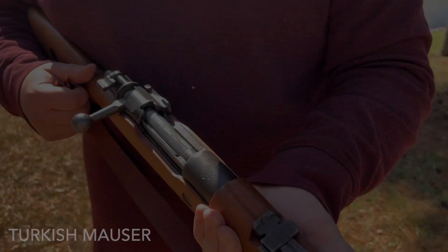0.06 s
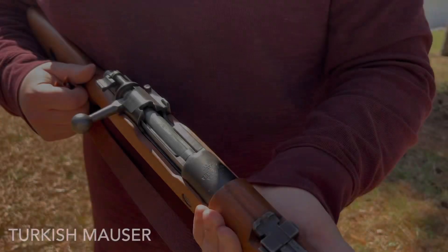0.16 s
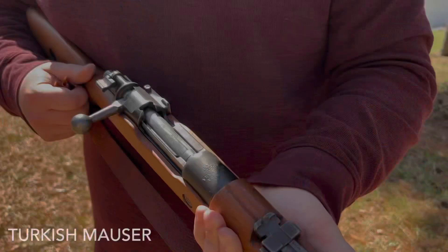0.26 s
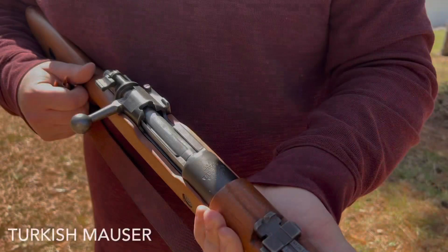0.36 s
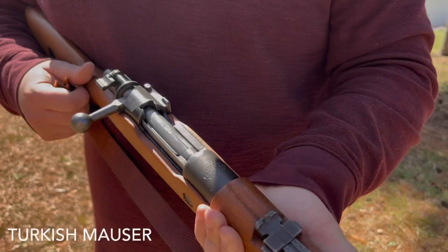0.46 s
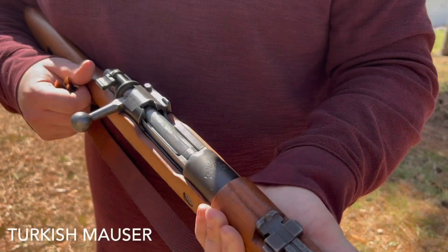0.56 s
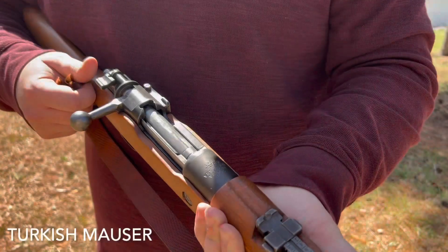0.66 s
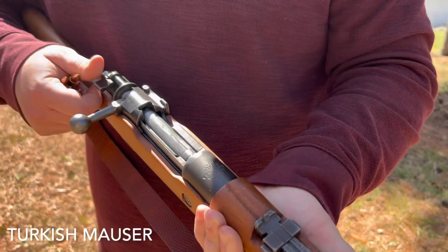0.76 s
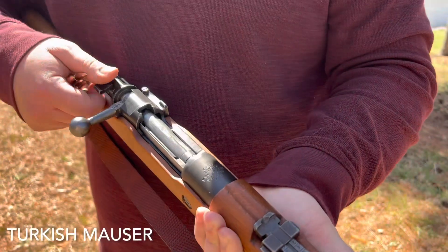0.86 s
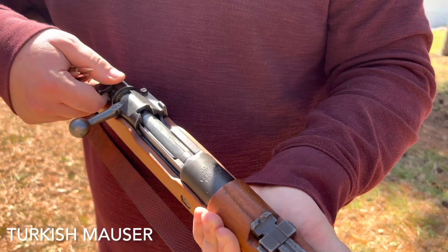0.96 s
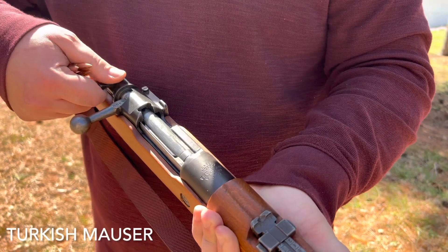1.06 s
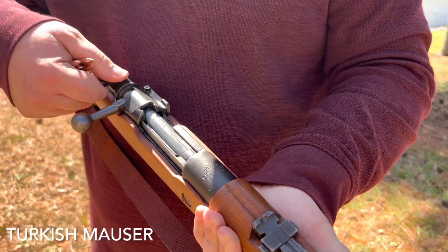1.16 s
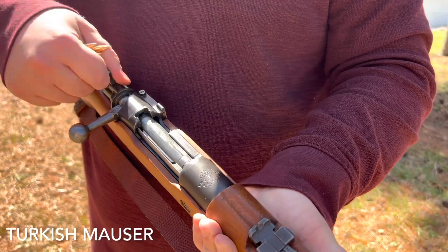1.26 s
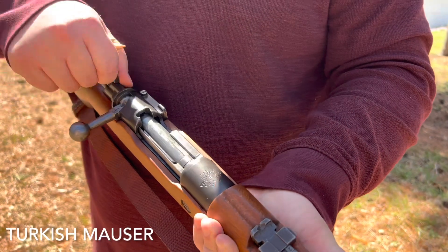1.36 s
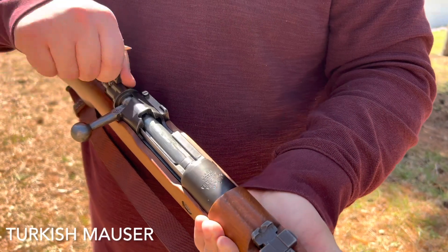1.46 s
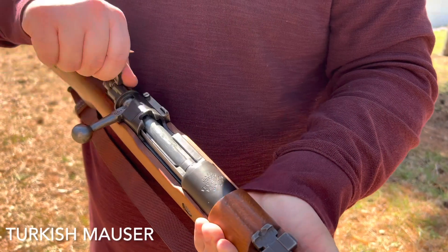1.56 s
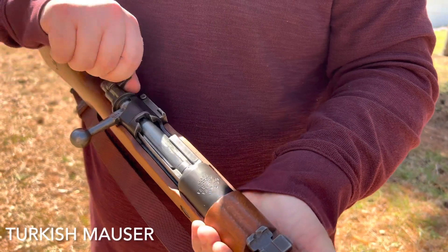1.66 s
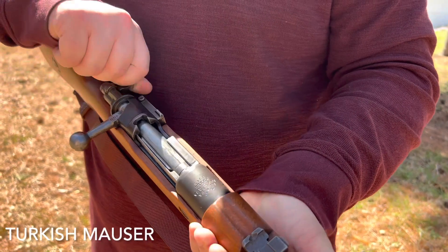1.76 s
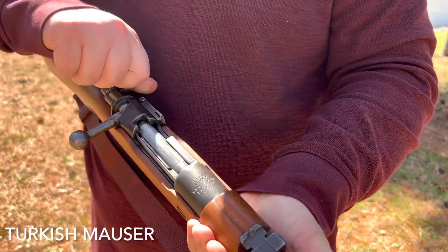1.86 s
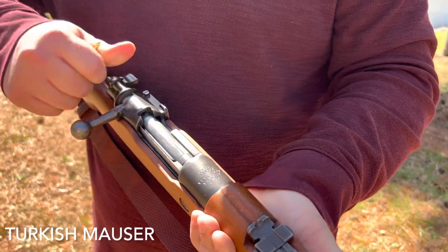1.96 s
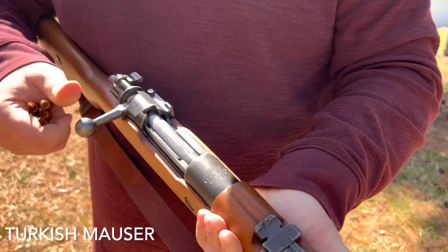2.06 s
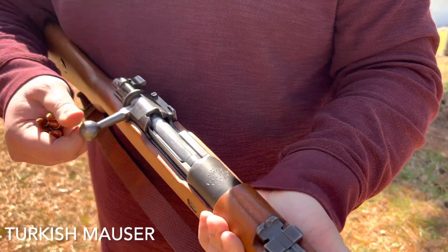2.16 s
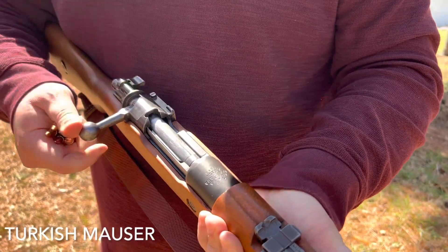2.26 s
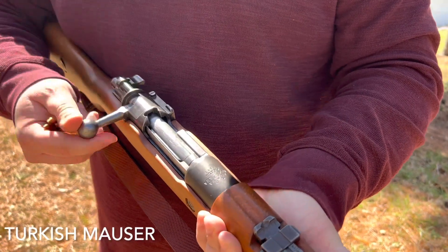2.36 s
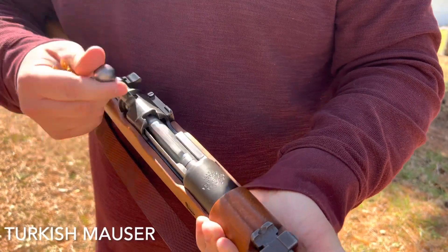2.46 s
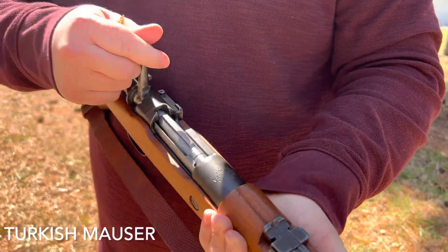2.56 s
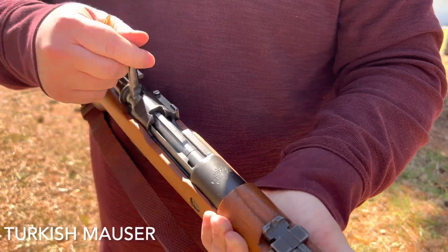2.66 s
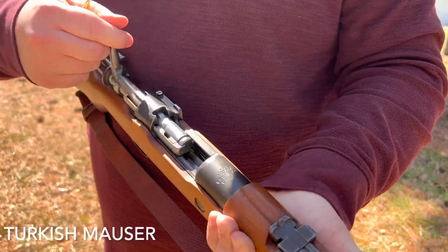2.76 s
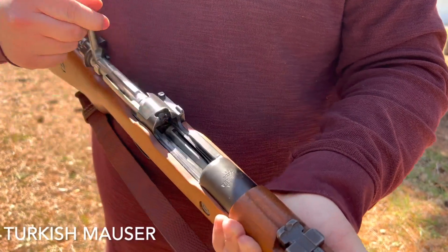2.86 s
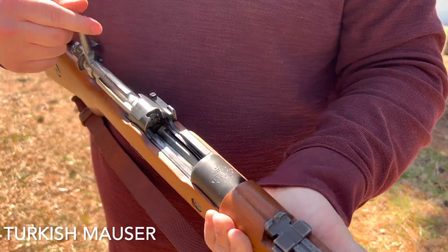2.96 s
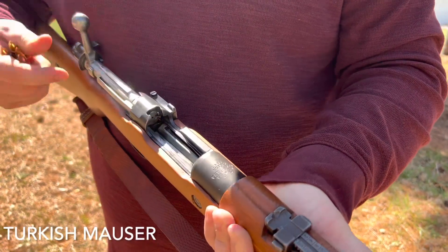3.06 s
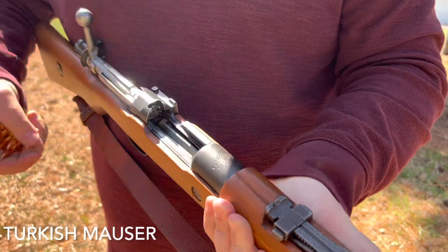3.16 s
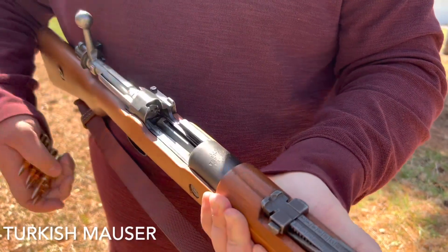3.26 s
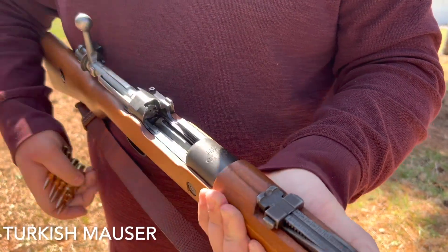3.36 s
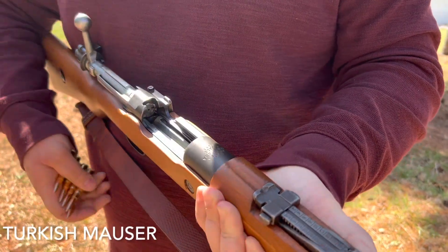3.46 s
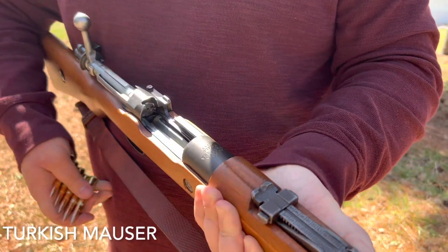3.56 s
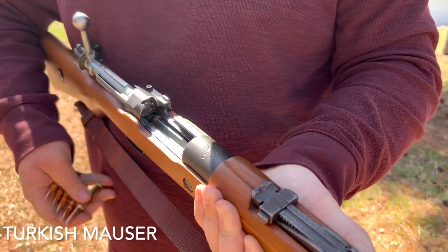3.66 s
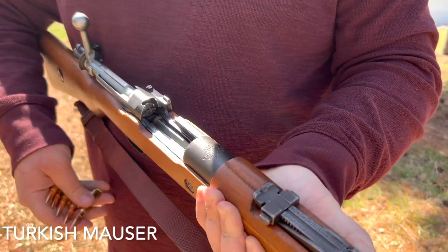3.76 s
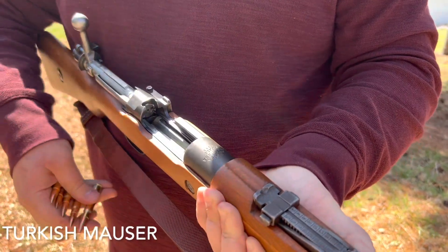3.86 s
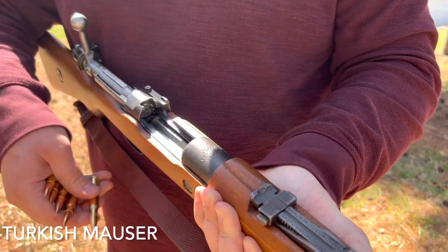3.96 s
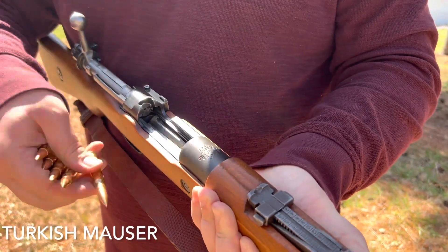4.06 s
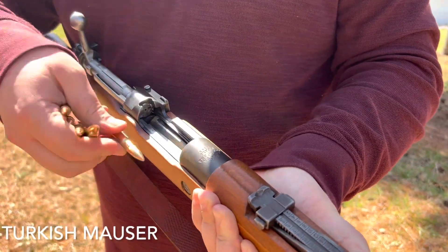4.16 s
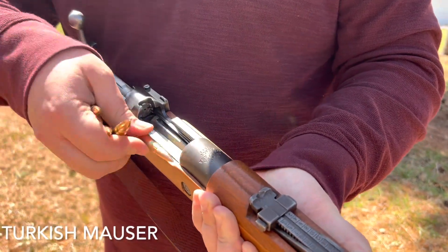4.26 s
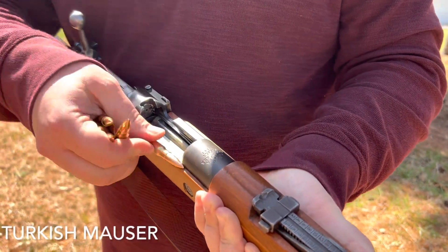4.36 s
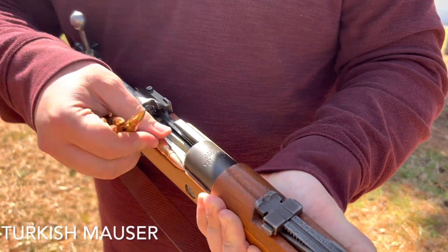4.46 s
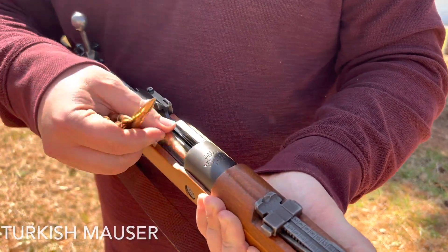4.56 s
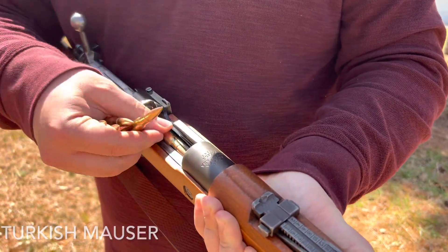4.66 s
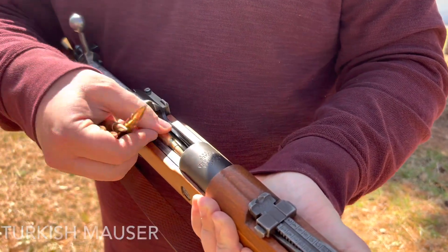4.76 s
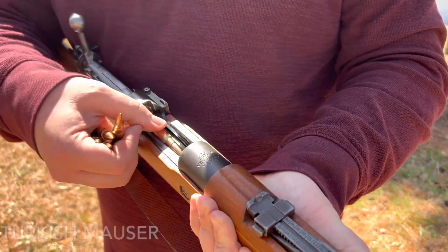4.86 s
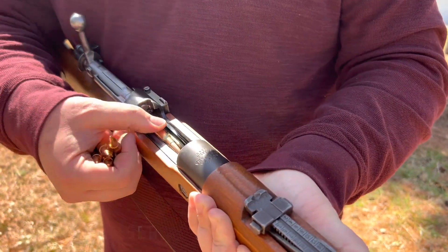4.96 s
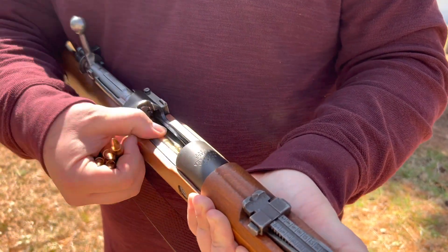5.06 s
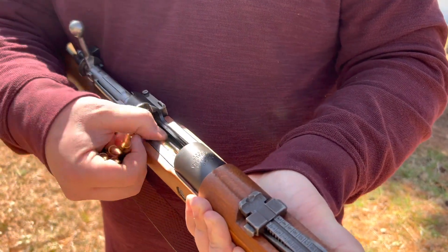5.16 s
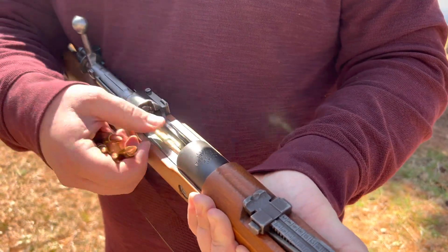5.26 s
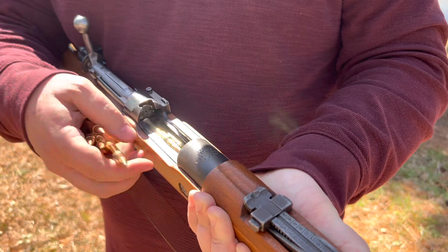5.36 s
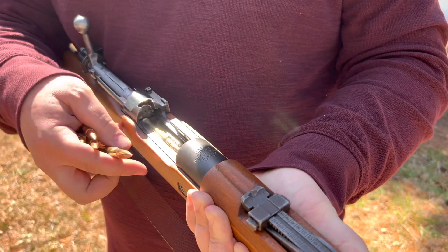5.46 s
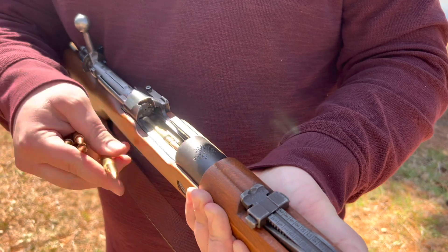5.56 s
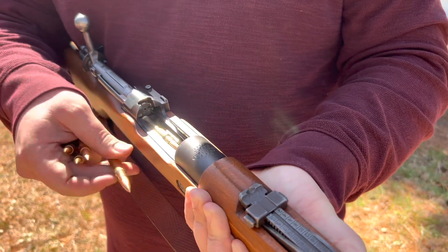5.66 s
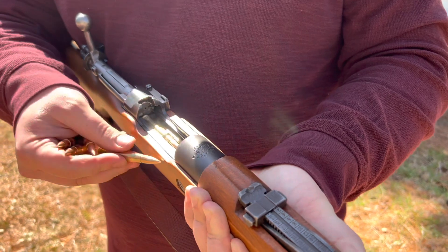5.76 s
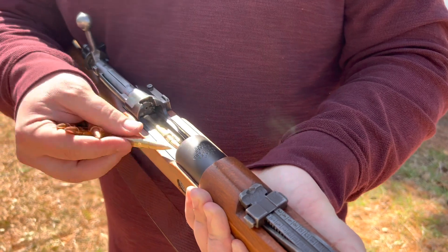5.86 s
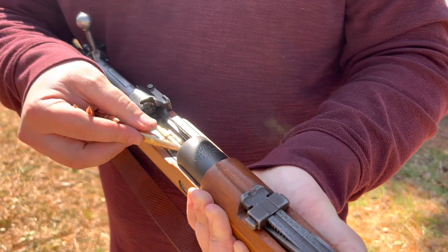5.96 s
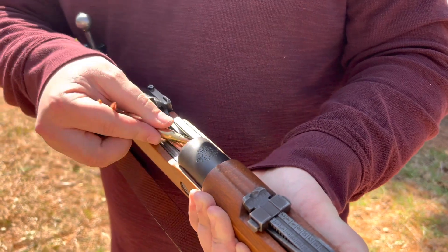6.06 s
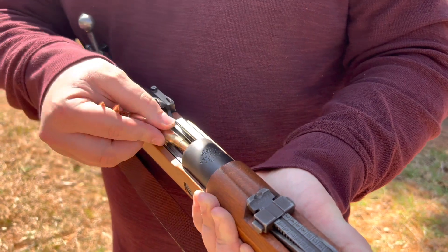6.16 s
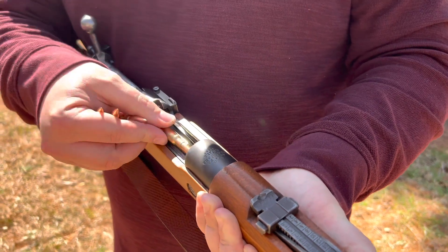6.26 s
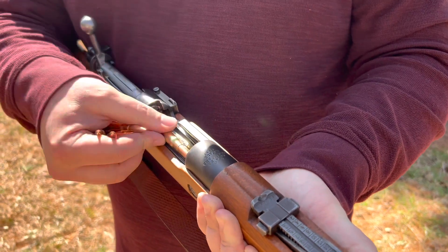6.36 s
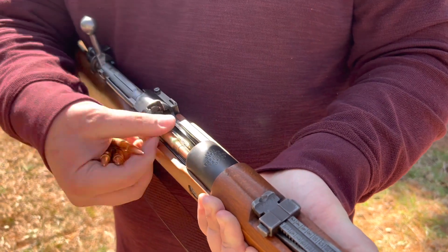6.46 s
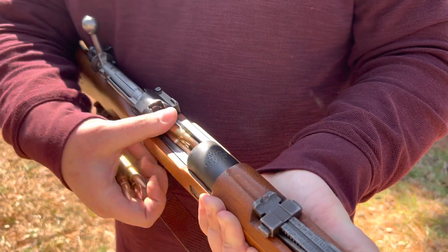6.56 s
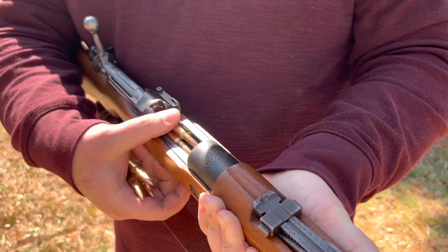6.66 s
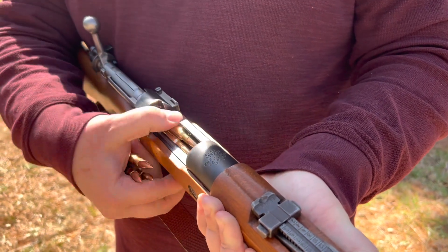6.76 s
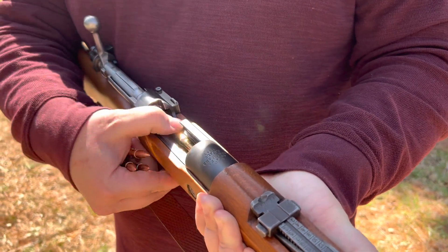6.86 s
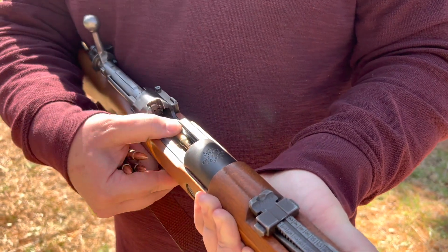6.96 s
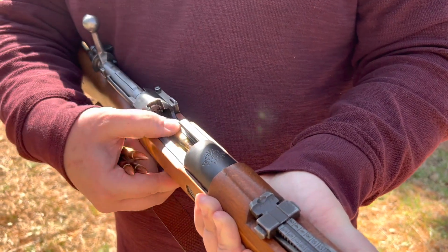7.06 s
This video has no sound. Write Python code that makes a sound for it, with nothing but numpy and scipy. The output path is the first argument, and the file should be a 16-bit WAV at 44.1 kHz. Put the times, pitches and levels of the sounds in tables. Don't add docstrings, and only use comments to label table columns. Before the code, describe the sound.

Close dry rifle handling in a breezy field: light knocks, loud bolt clatter, bright brass jingles, scraping and snapping cartridges into the magazine.

```python
import sys
import numpy as np
from scipy import signal
from scipy.fft import rfft, irfft
from scipy.io import wavfile
from scipy.ndimage import uniform_filter1d

SR = 44100
rng = np.random.default_rng(int(sys.argv[2]) if len(sys.argv) > 2 else 0)


def persist_wave(psi):
    counts = np.round(np.clip(psi, -1, 1) * 32767).astype(np.int16)
    wavfile.write(sys.argv[1], SR, np.atleast_2d(counts).T)


def how_loud(loudness_db):
    steps = np.asarray(loudness_db, float) / 20
    return 10 ** steps


N = 313992
BOLT_BACK_S = 3

# (centre [Hz], width [Hz], level [dB])
BUTT = [(140, 84, -11.5), (307, 45, 6.5), (514, 540, -4), (606, 180, -3), (1814, 140, 3.5)]
STOCK = [(822, 55, 0), (1077, 190, 1.5), (1185, 140, -5), (1583, 190, 5), (1773, 160, 2.5),
         (2180, 250, 6.5), (2630, 100, -1)]
BRASS = [(2595, 190, 1.5), (3393, 93, 2), (3950, 150, 3), (4400, 1600, 0.5), (4930, 220, -3.5),
         (5700, 340, 1.5), (6600, 680, 3.5)]
STEEL = [(7840, 420, 4.5), (9320, 1800, 5), (10500, 600, -9.5), (11550, 370, 8), (13110, 170, -5.5),
         (13100, 1100, -11.5), (14690, 730, -10.5), (14000, 1800, -11)]
# (modes, from [Hz], to [Hz])
PARTS = [(BUTT, 0, 1900), (STOCK, 780, 3000), (BRASS, 3000, 7000), (STEEL, 7000, 22050)]


def evened(x):
    return x / np.sqrt(np.mean(x ** 2) + 1e-20)


def smoothed(x, size, axis=-1):
    return uniform_filter1d(uniform_filter1d(x, size=size, axis=axis), size=size, axis=axis)


def read(points, hz, axis=1):
    table = np.array(points, float)
    return np.interp(np.log(hz + 1), np.log(table[:, 0] + 1), table[:, axis])


def fade():
    fade_s = 1.5
    return np.minimum(np.arange(N) / SR / fade_s, 1)


def swells(rows, rest_db):
    t = np.arange(0, N, 100) / SR
    bells = sum(how_loud(db) * np.exp(-((t - s) / half_s) ** 2) for s, db, half_s in rows)
    return how_loud(rest_db) * fade() + np.interp(np.arange(N) / SR, t, bells)


def noise(colour, likeness):
    hz = np.fft.rfftfreq(N, 1 / SR)
    a, b = rfft(rng.standard_normal((2, N))) * how_loud(read(colour, hz))
    same = np.clip(read(likeness, hz), -1, 1)
    return np.array([a, same * a + np.sqrt(1 - same ** 2) * b]), hz


def hiss():
    # (frequency [Hz], density [dB per Hz])
    hiss_colour = [(88, -23), (150, -4), (204, -8), (313, -10.5), (366, -11.5), (601, -17.5), (850, -14.5),
                   (1150, -18.5), (2200, -18.5), (4690, -23.5), (9000, -33), (11700, -69.5)]
    # (frequency [Hz], density [dB per Hz])
    port_colour = [(5880, -59.5), (10000, -23.5), (10600, -25), (10700, -27), (11300, -2.5), (13100, 2.5),
                   (15400, -16), (16500, -20)]
    # (frequency [Hz], likeness [-1..1])
    hiss_likeness = [(60, 0.58), (180, 0.98), (550, -0.35), (1650, -0.055), (4970, 0.87), (15000, -0.19)]
    # (time [s], level [dB], half width [s])
    hand_swells = [(1.2, -83.5, 0.1), (3.3, -81, 0.19), (2.2, -89, 0.17), (5.75, -84, 0.3),
                   (1.82, -68.5, 0.069), (2.8, -62.5, 0.28), (4.55, -61.5, 0.14), (5.2, -72.5, 0.464),
                   (6.2, -74.5, 0.22), (6.68, -64.5, 0.041), (7.1, -68, 0.44)]
    wash_db, rustle_db, port_db = -73, -71.5, -79

    z, hz = noise(hiss_colour, hiss_likeness)
    top, _ = noise(port_colour, hiss_likeness)
    wash = irfft(z * (hz < 800), N)
    wash = wash / np.std(irfft(z * (hz > 340) * (hz < 800), N))
    rustle = evened(irfft(z * (hz >= 800), N))
    out = how_loud(wash_db) * fade() * wash
    out = out + swells(hand_swells, rustle_db) * rustle
    out = out + how_loud(port_db) * fade() * evened(irfft(top, N))

    _, _, cells = signal.stft(out, SR, nperseg=512)
    patches = uniform_filter1d(rng.standard_normal(cells.shape[1:]), size=8, axis=0)
    patches = evened(uniform_filter1d(patches, size=14, axis=1))
    return signal.istft(cells * how_loud(2.8 * patches), SR, nperseg=512)[1][:, :N]


def wind():
    # (frequency [Hz], density [dB per Hz])
    wind_colour = [(12, -41.5), (28, -21), (48, -2.5), (63, -2), (85, -3.5), (110, -7), (258, -29),
                   (400, -38), (520, -56), (880, -120)]
    # (time [s], level [dB], half width [s])
    gusts = [(.14, -77.5, 0.33), (.44, -54.5, 0.048), (.59, -52, 0.066), (.95, -44, 0.061),
             (1.1, -42.5, 0.052), (1.3, -56.5, 0.25), (1.85, -67, 0.31), (2.5, -59, 0.14),
             (2.85, -45, 0.025), (4.2, -64.5, 0.48), (5.06, -48.5, 0.025), (5.3, -59, 0.045),
             (6.16, -53, 0.076), (6.46, -52, 0.17), (6.64, -44, 0.039), (6.85, -52, 0.085)]
    breeze_db, right_lag_s = -69.5, 0.00046

    z, hz = noise(wind_colour, [(30, .95), (200, .85)])
    z[1] *= np.exp(-2j * np.pi * hz * right_lag_s)
    lumps = evened(smoothed(rng.standard_normal(N), 1200))
    gain = swells(gusts, breeze_db) * how_loud(1.6 * lumps)
    return gain * evened(irfft(z, N)) * how_loud(np.array([[.9], [-.9]]))


def drone():
    # (multiple of shaft rate, level [dB])
    engine_orders = [(3, -4.5), (9, -5.5), (10, -9.5), (11, -10.5), (12, 0.5), (13, -13), (15, -13)]
    # (time [s], level [dB], half width [s])
    order_swells = [
        (.3, -86, 0.4),
        (1.1, -74, 0.3),
        (2.2, -76, 0.45),
        (3.8, -70, 0.46),
        (5.75, -74, 0.19),
        (6.25, -67, 0.27),
        (7.03, -63.5, 0.14),
    ]
    # (time [s], level [dB], half width [s])
    sixth_swells = [
        (1.6, -72.5, 0.88),
        (4.1, -64, 0.22),
        (4.7, -75, 0.37),
        (5.3, -68.5, 0.13),
        (5.7, -67, 0.25),
        (7.05, -61.5, 0.31),
    ]
    shaft_hz, rest_db = 25.88, -98

    t, slow = np.arange(N) / SR, np.arange(0, N + 200, 100) / SR
    waver = smoothed(rng.standard_normal((32, len(slow))), 40)
    waver = [np.interp(t, slow, evened(row)) for row in waver]
    turns = np.cumsum(shaft_hz * (1 + 0.0021 * waver[0])) / SR
    orders = np.zeros(N)
    for k, db in engine_orders:
        phase = 2 * np.pi * k * turns + .6 * waver[k + 16]
        orders += how_loud(db + 2.5 * waver[k]) * np.sin(phase)
    sixth = how_loud(2.5 * waver[6]) * np.sin(2 * np.pi * 6 * turns + .8 * waver[1])
    return np.sqrt(2) * (swells(order_swells, rest_db) * orders + swells(sixth_swells, rest_db) * sixth)


def mode(hz, centre_hz, width_hz):
    return 1j * hz * width_hz / (centre_hz ** 2 - hz ** 2 + 1j * hz * width_hz)


def confined(hz, lo_hz, hi_hz):
    return 1 / (1 + (0.76 * lo_hz / (hz + 1)) ** 8) / (1 + (hz / (0.93 * hi_hz)) ** 8)


def ports(a, b, hz):
    # (frequency [Hz], left lead [rad], left minus right [dB], likeness [0..1])
    port_response = [(100, .1, 1.5, .9), (700, .9, 4.5, .9), (1200, 1.4, 5.5, .83), (1800, 2.2, 2.5, .8),
                     (3000, 3.6, -2.5, .75), (4300, 6.0, -4, .75), (5600, 8, -1.5, .7), (7000, 10.5, 0, .8),
                     (8600, 10.6, .3, .9), (9700, 9.4, .5, .95), (13200, 6.3, 0, .94), (16000, 3.6, 0, .93)]
    same = np.clip(read(port_response, hz, axis=3), 0, 1) ** 2.24
    right = same * a + np.sqrt(1 - same ** 2) * b
    right = right * np.exp(-1j * read(port_response, hz, axis=1))
    tilt_db = read(port_response, hz, axis=2) / 2
    return np.array([a * how_loud(tilt_db), right * how_loud(-tilt_db)])


def tiny_impacts(shape, share, spread_db):
    hit = rng.random(shape) < share
    return rng.standard_normal(shape) * hit * how_loud(spread_db * rng.exponential(1, shape))



def knocks():
    # (time [s], level [dB], length [ms], ring [Hz])
    knock_rows = [(.966, -46, 6.5, 1610), (1.02, -35, 7.2, 1530), (1.0464, -49, 8.8, 860),
                  (1.204, -31.5, 6.6, 1550), (1.276, -38.5, 7.9, 1420), (1.31, -52.5, 11.4, 900),
                  (1.624, -56.5, 24, 930), (1.6755, -52.5, 6.8, 1600), (1.89, -55, 2.3, 1800),
                  (2.3696, -41, 4.3, 970), (2.6729, -39, 13, 950), (2.7355, -34, 8.8, 1494),
                  (2.7724, -32, 4.9, 1673), (4.2927, -25, 7.8, 1570), (4.2996, -17.5, 7.3, 1490),
                  (4.418, -38, 8, 1770), (4.975, -54, 8.2, 1090), (5.072, -41, 10.5, 1550),
                  (5.1302, -34.5, 7, 1100), (5.135, -35, 5.9, 1720), (5.164, -50.5, 5.4, 815),
                  (5.743, -21.5, 5.2, 1580), (6.0478, -22, 5.5, 1658), (6.052, -27, 7.2, 1570),
                  (6.22, -30, 7.3, 1563), (6.373, -47, 2.7, 1690), (6.389, -34, 7.5, 1960),
                  (6.539, -51.5, 8.4, 988), (6.6003, -30, 9.2, 1644), (6.709, -42, 10, 1550)]
    brass_db, steel_db, late_butt_db, ring_db = -10.5, -16, -16, 13.5
    return [(s, db + brass_db, db, db + steel_db, ms, hz, ring_db, db + late_butt_db * (s > BOLT_BACK_S))
            for s, db, ms, hz in knock_rows]


def brass_ticks():
    # (time [s], level [dB], length [ms], ring [Hz])
    tick_rows = [(1.008, -35.5, 5.8, 4670), (4.403, -27, 5.7, 3950), (4.4248, -31, 5.1, 4700),
                 (4.4551, -34.5, 6.7, 4400), (4.7267, -32, 8.9, 4190), (5.2865, -40.5, 7.3, 4670),
                 (5.3695, -43.5, 8.1, 4600), (5.4234, -31, 7.2, 4500), (5.498, -41, 5.1, 4600),
                 (5.5428, -42, 6.2, 3950), (5.64, -55, 13, 4500), (5.679, -55, 8, 4530),
                 (5.936, -36.5, 9.3, 3900), (5.974, -31, 5.7, 4200), (5.982, -37, 9.4, 4100)]
    stock_db, steel_db, ring_db = -19, -13, 17
    return [(s, db, db + stock_db, db + steel_db, ms, hz, ring_db, db + stock_db)
            for s, db, ms, hz in tick_rows]


def snaps():
    bolt_rows = [(1.1907, -36.5, -36, -45.5, 5.9), (1.2653, -40.5, -39, -53, 2.7),
                 (1.611, -46, -45, -56.5, 2.94), (1.742, -37, -41.5, -46.5, 16.6),
                 (1.7499, -46, -35.5, -49, 14), (1.7672, -34, -37, -26, 3),
                 (1.882, -53.5, -51.5, -55.5, 13.4), (2.381, -45.5, -47, -53, 6.2),
                 (2.421, -47, -47, -63.5, 8.6), (2.4611, -13, -15.5, -19.5, 7.4),
                 (2.48, -17, -16, -28, 9.8), (2.486, -27.5, -23.5, -26, 4.2),
                 (2.4908, -14.5, -17.5, -12.5, 6.8), (2.4942, -14.5, -23.5, -14, 5),
                 (2.508, -32, -35, -57, 9.3), (2.5186, -37.5, -42, -47, 3.6), (2.686, -30, -32, -46, 5.6),
                 (2.6921, -22.5, -25.5, -27.5, 6.8), (2.7068, -22, -27, -29.5, 6.1),
                 (2.721, -28.5, -27.5, -33, 8.3), (2.7603, -32, -32, -32.5, 6.4),
                 (2.787, -29, -28.5, -34, 8), (2.8036, -43.5, -42.5, -39, 14), (2.819, -22, -21, -28, 3),
                 (2.8223, -16.5, -18, -19, 8.6), (2.8369, -20.5, -29, -30, 7.7),
                 (2.851, -22.5, -32, -38.5, 14.5), (2.8574, -14.5, -24.5, -19, 5.8),
                 (2.8645, -35, -37.5, -33, 3.3)]
    loading_rows = [(4.299, -19.5, -21.5, -23, 7.2), (4.433, -31, -38.5, -31, 7.4),
                    (4.4922, -38, -47.5, -35.5, 3.6), (4.5062, -41.5, -49, -43, 20),
                    (4.528, -31.5, -40.5, -29.5, 10.4), (4.574, -24, -35.5, -27, 4.3),
                    (4.597, -30.5, -42, -44, 13), (4.6071, -21, -26, -23, 8.3), (4.62, -38, -36, -53, 8.4),
                    (4.7475, -38.5, -51.5, -33.5, 1.3), (4.7557, -46, -51, -38.5, 7.2),
                    (4.877, -43, -46, -48.5, 6.7), (5.0389, -21, -30, -22.5, 7.2),
                    (5.0481, -26, -37, -14, 7.1), (5.0546, -23.5, -26, -25, 5.5),
                    (5.06, -26, -39, -65, 5.6), (5.2111, -36.5, -49, -43, 4.4),
                    (5.226, -23, -26.5, -20.5, 6.7), (5.2462, -19.5, -29, -19.5, 6.7),
                    (5.2547, -47, -58, -59, 4)]
    stacking_rows = [(5.9534, -29.5, -36.5, -43, 5.6), (6.014, -39, -44, -41, 6.7),
                     (6.0614, -37.5, -47, -41, 11), (6.0713, -24, -27, -34, 2.6),
                     (6.093, -23, -34, -33.5, 3.6), (6.3171, -27, -38.5, -27.5, 5.7),
                     (6.3233, -33.5, -36, -36, 6.7), (6.585, -15.5, -17.5, -13.5, 8.3),
                     (6.81, -34, -36.5, -34.5, 5.8), (6.8194, -27.5, -27, -34, 7),
                     (6.861, -28, -22.5, -27.5, 11), (6.868, -21.5, -28, -42, 9.2),
                     (6.877, -17, -25, -15, 7.6), (6.8835, -21, -26, -21, 5.5),
                     (6.8862, -16.5, -18, -16, 8), (7.0763, -31, -26.5, -26.5, 9)]
    brass_hz, bolt_stock_hz, late_stock_hz, spread, ring_db = 4500, 930, 1559, 0.06, 5

    rows = []
    for s, brass_db, stock_db, steel_db, ms in bolt_rows + loading_rows + stacking_rows:
        stock_hz = late_stock_hz if s > BOLT_BACK_S else bolt_stock_hz
        hz = brass_hz if brass_db >= stock_db else stock_hz
        hz = hz * (1 + spread * rng.standard_normal())
        rows.append((s, brass_db, stock_db, steel_db, ms, hz, ring_db, stock_db))
    return rows


def loose_cartridges():
    # (time [s], level [dB], length [ms], ring [Hz])
    clink_rows = [(3.1364, -55, 5.3, 4540), (3.1527, -37, 7.2, 4300), (3.1901, -29.5, 8.8, 4400),
                  (3.1958, -25.5, 5.1, 4520), (3.2628, -16, 7.3, 4500), (3.278, -24.5, 5.4, 3800),
                  (3.3, -22, 7.9, 4390), (3.3039, -24.5, 5, 4800), (3.3208, -42.5, 6, 3330),
                  (3.424, -27, 4.9, 5900), (3.427, -25, 4.5, 4070), (3.445, -40, 9.6, 4250),
                  (3.5142, -34.5, 7.9, 4580), (3.533, -50, 8.6, 4400), (3.625, -33.5, 3.55, 4400),
                  (3.657, -43.5, 5.5, 3066), (4.1286, -46.5, 9.3, 4760)]
    stock_db, steel_db, ring_db = -35, -15, 20
    return [(s, db, db + stock_db, db + steel_db, ms, hz, ring_db, db + stock_db)
            for s, db, ms, hz in clink_rows]


def contacts():
    sharp = (1.1, 1.2, 1.5, 3.0)
    sudden = (0.98, 2, 2, 3.1)
    wood_damping, brass_damping = 0.12, 0.045
    crack_db = -13
    size, lead = 3072, 500

    rows = knocks() + brass_ticks() + snaps() + loose_cartridges()
    s, brass_db, stock_db, steel_db, ms, ring_hz, ring_db, butt_db = np.transpose(rows)[:, :, None]
    butt_db = butt_db + np.where(s < BOLT_BACK_S, -14, -21)
    t_ms = (np.arange(size) - lead) / SR * 1000
    hz = np.fft.rfftfreq(size, 1 / SR)

    swell_ms = np.clip(0.52 * (ms - 3.1), .8, 3.2)
    chatter_ms = np.maximum(ms - 3.1, .35)
    rise = (t_ms + 1.5) / swell_ms
    decay = -(abs(t_ms + 1.1) / (1.685 * chatter_ms)) ** 1.22
    force = np.exp(np.where(t_ms < -.9, rise, decay))
    impacts = tiny_impacts((len(s), 2, size), share=0.5, spread_db=1.5).transpose(1, 0, 2)

    sound = 0
    levels = [butt_db, stock_db, brass_db, steel_db]
    for (part, lo, hi), db, late, early in zip(PARTS, levels, sharp, sudden):
        a, b = rfft(impacts * force ** np.where(t_ms < -.9, early, late))
        luck = rng.standard_normal((len(s), len(part), 2))
        body = how_loud(crack_db)
        for k, (f, width, d) in enumerate(part):
            strength = (-1) ** k * how_loud(d + 2.6 * luck[:, k, :1])
            body = body + strength * mode(hz, f * (1 + 0.034 * luck[:, k, 1:]), width)
        if lo > 0:
            damping = brass_damping if lo > 2000 else wood_damping
            rings = (ring_hz > lo) & (ring_hz <= hi)
            body = body + rings * how_loud(ring_db) * mode(hz, ring_hz, damping * ring_hz)
        rung = irfft(ports(a, b, hz) * body * confined(hz, lo, hi), size)
        peak = uniform_filter1d((rung ** 2).mean(0), size=110).max(1, keepdims=True)
        sound = sound + how_loud(db) * rung / np.sqrt(peak)

    out = np.zeros((2, N + size))
    for k, at in enumerate(np.round(s[:, 0] * SR).astype(int) - lead):
        out[:, at:at + size] += sound[:, k]
    return out[:, :N]


def echoes(x):
    # (frequency [Hz], t60 [s])
    echo_t60 = [(500, 0.45), (3000, 0.16), (12000, 0.033)]
    # (frequency [Hz], level [dB])
    echo_colour = [(500, -1), (4000, 3.5), (8000, -13.5), (16000, -22)]
    echo_db = -33.5

    hz, t, z = signal.stft(rng.standard_normal((2, SR // 2)), SR, nperseg=256)
    level_db = read(echo_colour, hz)[:, None] - 60 * t / read(echo_t60, hz)[:, None]
    tail = signal.istft(z * how_loud(level_db), SR, nperseg=256)[1]
    tail = tail / np.linalg.norm(tail[0])
    return how_loud(echo_db) * signal.fftconvolve(x, tail, axes=1)[:, :N]


def scrapes():
    # (from [s], to [s], stock [dB], brass [dB])
    stroke_rows = [(2.438, 2.475, -49, -45), (2.472, 2.562, -59, -50.5), (2.664, 2.717, -39, -47.5),
                   (2.755, 2.899, -43, -42.5), (3.096, 3.19, -87, -60), (3.227, 3.334, -63.5, -45.5),
                   (3.345, 3.474, -84.5, -58), (3.494, 3.519, -60.5, -48), (3.645, 3.695, -94, -58),
                   (4.382, 4.454, -54, -52), (4.487, 4.642, -39.5, -40.5), (4.82, 4.89, -57, -61),
                   (5.027, 5.062, -36.5, -40), (5.21, 5.256, -31, -27), (5.625, 5.667, -78, -70),
                   (5.658, 5.684, -84, -66), (5.835, 5.916, -56, -71.5), (5.936, 6.046, -44, -55.5),
                   (6.01, 6.16, -42, -56.5), (6.161, 6.219, -50.5, -63), (6.555, 6.642, -43.5, -47),
                   (6.836, 6.882, -49, -43)]
    steel_db = -22

    hz, t = np.fft.rfftfreq(N, 1 / SR), np.arange(0, N, 20) / SR
    stutter = how_loud(6.4 * evened(smoothed(rng.standard_normal(N), 120)))
    a, b = rfft(stutter * tiny_impacts((2, N), share=.3, spread_db=2.2))
    heard = ports(a, b, hz)
    strokes = [(*row, row[3] + steel_db) for row in stroke_rows]
    out = np.zeros((2, N))
    for column, (part, lo, hi) in enumerate(PARTS[1:], 2):
        body = sum((-1) ** k * how_loud(d) * mode(hz, f, 2.0 * width) for k, (f, width, d) in enumerate(part))
        pressure = np.zeros(len(t))
        for row in strokes:
            u = np.clip((t - row[0]) / (row[1] - row[0]), 0, 1)
            pressure += how_loud(row[column]) * np.sin(np.pi * u) ** 0.88
        pressure = np.interp(np.arange(N) / SR, t, pressure)
        out += pressure * evened(irfft(heard * body * confined(hz, lo, hi), N))
    return out


def stop_ring():
    # (time [s], frequency [Hz], level [dB], t60 [s])
    stop_modes = [
        (2.866, 1707, -43, 0.15),
        (2.864, 3900, -34, .06),
        (4.303, 800, -50, .2),
        (4.303, 1600, -53, .15),
    ]
    out, t = np.zeros(N), np.arange(SR // 4) / SR
    for s, hz, db, t60 in stop_modes:
        attack = np.minimum(t / 0.0034, 1)
        out[round(s * SR):][:len(t)] += how_loud(db - 60 * t / t60) * attack * np.sin(2 * np.pi * hz * t)
    return out


def whistles(rows, wobble_hz, flutter_db):
    out = np.zeros(N)
    for s, length_s, from_hz, to_hz, db in rows:
        u = np.linspace(0, 1, round(length_s * SR))
        wobble, flutter = smoothed(rng.standard_normal((2, 8000)), 150)[:, :len(u)] * 15
        hz = from_hz + (to_hz - from_hz) * u + wobble_hz * wobble
        shape = np.minimum(np.minimum(u, 1 - u) * length_s / 0.0093, 1)
        gain = np.sqrt(2) * how_loud(db + flutter_db * flutter) * shape
        out[round(s * SR):][:len(u)] += gain * np.sin(2 * np.pi * np.cumsum(hz) / SR)
    return out


def bird():
    # (start [s], length [s], from [Hz], to [Hz], level [dB])
    bird_notes = [
        (4.005, 0.029, 2424, 2650, -67),
        (4.025, 0.12, 2604, 2506, -62.5),
        (4.15, 0.086, 2476, 2430, -77),
        (4.252, 0.023, 2630, 3100, -67),
        (4.268, 0.021, 3230, 2980, -64),
    ]
    return whistles(bird_notes, wobble_hz=26, flutter_db=1.0) * how_loud(np.array([[-3.5], [2.5]]))


def insect():
    # (start [s], length [s], from [Hz], to [Hz], level [dB])
    squeaks = [(4.028, .04, 11680, 11950, -76.5), (4.066, 0.024, 11960, 11400, -71),
               (4.094, .035, 11550, 12200, -78), (4.166, 0.045, 11060, 12100, -69.5),
               (4.224, 0.05, 11300, 11670, -73), (5.56, 0.039, 11300, 11790, -71),
               (5.635, 0.065, 11360, 11880, -73.5), (5.762, 0.057, 11420, 11500, -82),
               (5.805, 0.035, 11500, 11340, -75), (5.875, 0.037, 11800, 11800, -78),
               (5.7, 0.037, 11600, 11300, -76), (4.13, 0.019, 11700, 10800, -84)]
    return whistles(squeaks, wobble_hz=90, flutter_db=2)


def scene():
    rifle = contacts() + scrapes() + stop_ring()
    return hiss() + wind() + drone() + rifle + echoes(rifle) + bird() + insect()


def roll_off(x):
    return signal.sosfilt(signal.butter(12, 16990, fs=SR, output="sos"), x)


def record(dry):
    edge_hz, limit = 16100, .88
    dry = signal.oaconvolve(dry, signal.firwin(301, edge_hz, fs=SR)[None], "same")
    knee = .8 * limit
    room = limit - knee
    over = np.maximum(abs(dry) - knee, 0)
    mix = dry - np.sign(dry) * (over - room * np.tanh(over / room))
    return roll_off(mix)


dry = scene()
out = record(dry)
persist_wave(out)
```